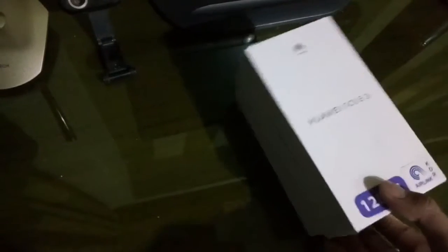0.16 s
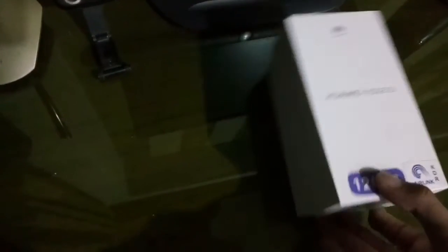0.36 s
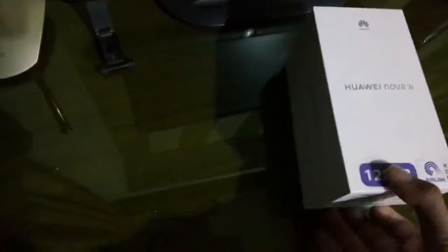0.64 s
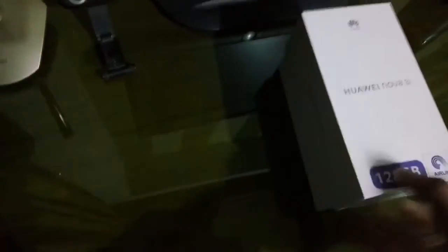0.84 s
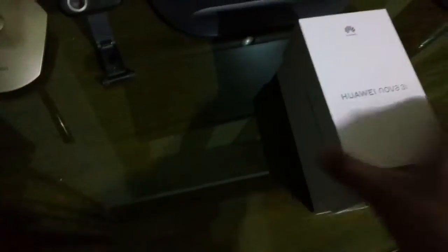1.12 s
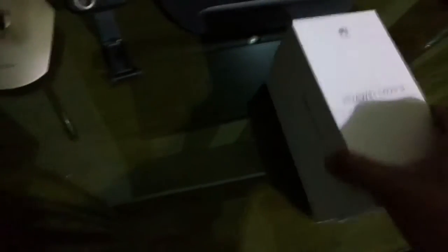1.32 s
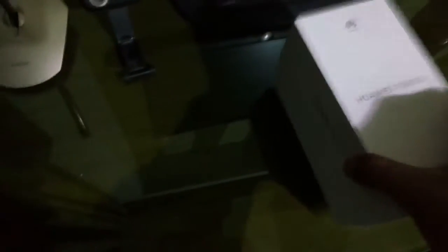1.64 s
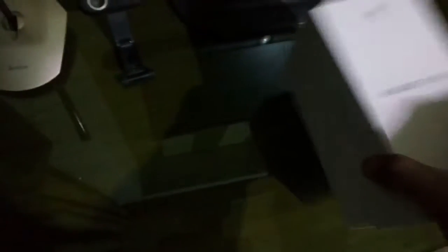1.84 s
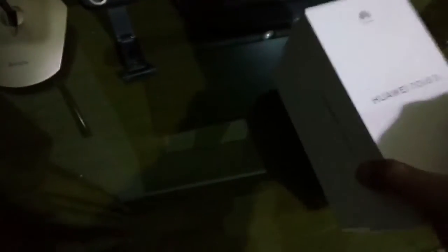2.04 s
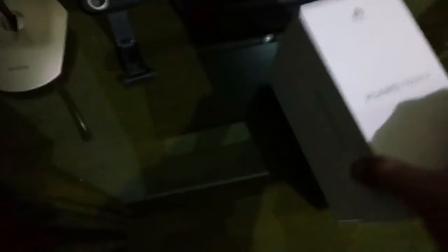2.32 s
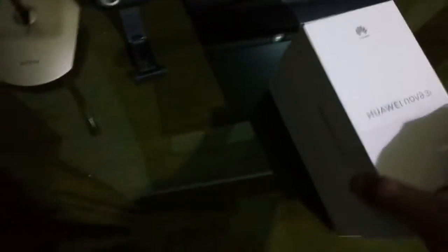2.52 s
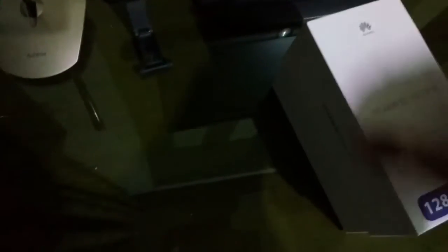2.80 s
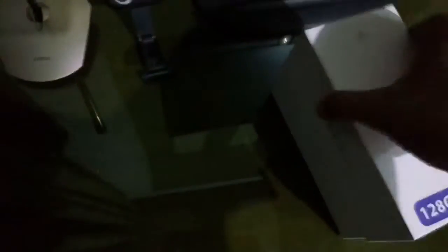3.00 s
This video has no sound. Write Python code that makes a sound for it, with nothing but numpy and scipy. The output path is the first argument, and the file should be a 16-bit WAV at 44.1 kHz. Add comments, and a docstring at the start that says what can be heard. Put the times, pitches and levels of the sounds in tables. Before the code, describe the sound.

A cardboard box is handled, knocking and rattling as its tight lid is worked loose.

```python
"""In a small, quiet room, a cardboard box is turned in the hand on a table, close to a phone.
Fingers rub over the card in tiny slips, and the air in the hollow box pops once.
The box knocks and rattles as its tight lid is worked loose; each knock rings the card and the table.
The box, its echo and a low rumble are on the left only; both channels carry a faint hiss."""
import sys
import numpy as np
from scipy import signal
from scipy.fft import rfft, irfft, next_fast_len
from scipy.io import wavfile

SR = 44100
rng = np.random.default_rng(int(sys.argv[2]) if len(sys.argv) > 2 else 0)


def materialize(psi):
    """Save the field psi as 16-bit PCM at rate SR to the path in sys.argv[1].

    A 1-D psi becomes a single channel; in a 2-D psi each row is a channel.
    """
    bounded = np.clip(np.atleast_2d(psi).T, -1, 1)
    quanta = np.round(bounded * 32767).astype(np.int16)
    wavfile.write(sys.argv[1], SR, quanta)


N = 138915

# tone of the microphone hiss: pitch_hz, gain_db
HISS_TONE = [(25, 5.5), (70, 4), (150, 7), (400, 0), (1000, -3.5), (3000, -11.5), (6000, -13.5),
             (7600, -24.5), (16000, -30)]
# tone of the room's rumble: pitch_hz, gain_db
RUMBLE_TONE = [(25, -26.5), (48, -17.5), (68, -4), (88, -3), (130, -8.5), (200, -14.5), (400, -30.5),
               (1500, -54.5)]
# how rumble and hum rise and fall together: time_s, gain_db
RUMBLE_SWELL = [(0, -55.5), (.24, -53), (.36, -64.5), (.52, -68), (.6, -52), (1.05, -56.5), (1.15, -66.5),
                (1.3, -51.5), (2.3, -48.5), (2.8, -54.5), (3.05, -53.5)]
# finger strokes: peak_s, rise_s, fall_s, body_db, rasp_db, hiss_db, squeak_hz, squeak_db
STROKES = [(.02, 0.14, 0.048, -58, -58.5, -84, 3220, -70),
           (.098, 0.011, 0.0098, -77, -56, -67, 3150, -51.5),
           (0.101, 0.0052, 0.01, -72, -62, -71, 5600, -53),
           (0.137, 0.0061, 0.0055, -62, -48, -53.5, 3130, -44),
           (.17, 0.03, 0.023, -51, -59, -60, 5400, -76), (.402, 0.013, 0.012, -57, -43.5, -41, 5100, -45.5),
           (.48, 0.19, 0.21, -67, -60.5, -65, 2990, -65.5),
           (.595, .045, 0.022, -50.5, -61, -51.5, 3430, -62), (.655, 0.034, 0.02, -52, -49, -54, 3380, -50),
           (.747, 0.049, 0.0062, -50, -53, -64, 3380, -59.5),
           (.783, 0.014, 0.013, -41, -37.5, -48, 3380, -39.5),
           (0.7931, 0.0018, 0.0021, -28, -54, -50, 5220, -22.5),
           (0.984, 0.015, 0.013, -57, -51, -54, 3330, -47.5),
           (1.37, 0.038, 0.046, -52, -54.5, -57, 4660, -66), (1.63, 0.021, 0.18, -54, -56, -69, 3560, -85),
           (1.487, .006, 0.0092, -42, -62, -38, 3580, -68),
           (1.72, 0.0063, 0.012, -36.5, -36.5, -48.5, 1800, -37),
           (1.77, 0.038, 0.03, -49.5, -44, -51, 5840, -69),
           (1.875, 0.031, 0.086, -46.5, -47, -58, 5370, -70),
           (1.978, .006, 0.093, -46.5, -48.5, -69, 1520, -67),
           (2.055, 0.028, 0.014, -41, -51.5, -48, 5980, -54.5),
           (2.125, .008, 0.038, -34, -34, -46, 4480, -47.5),
           (2.35, 0.024, 0.034, -25, -29.5, -40.5, 4000, -43.5),
           (2.78, 0.08, .03, -78.5, -76, -60, 5590, -64.5),
           (3.14, 0.031, .04, -58.5, -60.5, -65, 3250, -78)]
# tone of rubbed card: pitch_hz, gain_db
RUB_TONE = [(120, -3), (330, 10.5), (480, 2), (780, -8.5), (1150, 5), (1700, -2), (2350, -6), (3000, -4.5),
            (3500, -6.5), (4300, -10), (5500, -10.5), (7600, -25.5), (15000, -35)]
# knocks on the box: start_s, thump_hz, clack_hz, thump_db, clack_db, crack_db, fizz_db
BOX_KNOCKS = [ (0.1, 352, 1480, -68, -69, -64, -69), (0.1348, 386, 1820, -51, -43.5, -51, -69),
              (0.402, 406, 2010, -61, -46, -60, -60.5), (0.681, 358, 1200, -54, -51, -75, -78),
              (0.7831, 323, 1020, -34.5, -33.5, -37.5, -58), (0.7919, 313, 930, -33.5, -31, -42.5, -44.5),
              (0.819, 336, 1370, -30.5, -45, -55, -74), (.832, 330, 1590, -41, -45.5, -47.5, -73),
              (0.987, 374, 910, -41, -58, -76, -78), (1.280, 292, 1060, -44, -52, -57, -76),
              (1.308, 331, 1050, -56.5, -50, -60, -92), (1.451, 360, 705, -39.5, -54, -61, -83),
              (1.470, 470, 750, -21, -23.5, -44, -58.5), (1.4916, 400, 930, -26.5, -21, -35.5, -52),
              (1.675, 380, 763, -40, -58, -66, -92), (1.721, 356, 1360, -30.5, -39.5, -53, -67),
              (1.7351, 400, 1390, -45.5, -37.5, -40, -58), (1.742, 430, 1160, -26, -25, -32, -55),
              (1.755, 385, 1300, -49.5, -33, -40, -59), (1.760, 394, 1250, -36, -40.5, -47, -71),
              (1.7766, 378, 970, -35.5, -37, -54, -70), (1.8098, 382, 745, -25.5, -27.5, -49, -61),
              (1.998, 385, 750, -27.5, -45, -61, -74), (2.019, 406, 800, -26, -42.5, -44.5, -65),
              (2.035, 403, 1400, -40.5, -37, -42, -69.5), (2.04, 378, 1100, -31, -37.5, -42, -58),
              (2.059, 394, 1430, -41, -31, -40.5, -59), (2.0763, 400, 870, -10.5, -18, -32.5, -48),
              (2.085, 379, 850, -39.5, -20, -32, -57.5), (2.1042, 335, 1200, -21.5, -25, -24.5, -45.5),
              (2.115, 400, 1150, -24.5, -23.5, -28.5, -53.5), (2.1265, 421, 750, -19.5, -18, -32.5, -51),
              (2.272, 400, 900, -40.5, -64.5, -74.5, -91.5), (2.313, 338.7, 703, -27, -43.5, -57.5, -71),
              (2.3228, 600, 1000, -12, -11, -27.5, -44), (2.337, 332, 724, -23, -38.5, -29, -53),
              (2.3451, 420, 750, -9.5, -20, -31, -47.5), (2.3517, 480, 1000, -21, -45, -25.5, -49.5),
              (2.357, 377, 803, -22.5, -33.5, -50.5, -63.5), (2.3947, 507, 1262, -24.5, -18.5, -33, -49.5),
              (2.409, 470, 800, -20, -38, -47, -60), (2.524, 377, 1170, -27, -29.5, -39.5, -63),
              (2.6582, 329, 748, -23.5, -23.5, -40, -59), (2.6642, 395.5, 995, -34, -27, -39.5, -56.5)]
# pitch ranges of thump, clack, crack and fizz, also used for the rubs: low_hz, high_hz
PITCH_RANGES = [(290, 650), (650, 2000), (2000, 7000), (7000, 17000)]
# notes the card panels ring at (a fade is the time to drop 60 dB): pitch_hz, gain_db, fade_s
CARD_NOTES = [(275, -2.5, 0.036), (332, 6, 0.038), (414, 5.5, 0.042), (470, 0, 0.049), (544, -1.5, 0.096),
              (643, 3.5, 0.037), (763.5, 0, 0.022), (946, -0.5, 0.017), (1102, 0, .028), (1141, -16, 0.008),
              (1540, -8.5, 0.043), (1820, -0.5, 0.021), (2000, 1.5, .016)]
# tone of the crack at the card's edge: pitch_hz, gain_db
CRACK_TONE = [(500, 5), (2000, 3), (2700, -0.5), (3400, -1.5), (4500, -11), (5500, -8.5), (6500, -17.5),
              (7600, -23), (11000, -21), (16000, -23.5)]
# notes of the table under the box: pitch_hz, gain_db, fade_s
TABLE_NOTES = [(62, -2, 0.66), (111.2, 4, 0.99), (121.1, -4, .35), (167.6, 4, 0.63)]
# notes of the air inside the box: pitch_hz, gain_db, fade_s
AIR_NOTES = [(337, 3, 0.058), (309.6, -12, 0.23), (176, -17, 0.12)]
# the room's echo, in octave-wide bands: pitch_hz, fade_s, gain_db
ROOM_ECHO = [(116.4, 0.49, -1), (237.6, .42, -11.5), (389.3, .3, -10.5), (745, 0.27, -8.5),
             (1650, 0.3, -8.5), (3200, .28, -11), (6400, 0.18, -10), (12000, 0.14, -10)]
# notes that ring between the walls: pitch_hz, gain_db, fade_s
ROOM_NOTES = [(170.3, -9, .4), (240, -9.5, .33), (276, -6, .27), (318.8, 4, 0.33), (419.7, 0.5, 0.39),
              (451, -1.5, 0.37), (547, -4, 0.44), (915, -6, 0.398)]


def gain(db):
    """Turn decibels into a number to multiply by."""
    return 10 ** (np.asarray(db) / 20)


def set_level(x, db):
    """Set a sound's average (rms) level."""
    return x * gain(db) / np.sqrt(np.mean(x ** 2))


def set_hit_level(x, db):
    """Scale a hit so that its energy, spread over 10 ms, has the given level."""
    return x * gain(db) / np.sqrt(np.sum(x ** 2) / (.01 * SR))


def band(x, low_hz, high_hz, order=3):
    """Keep the sound between two pitches."""
    edges = [low_hz, min(high_hz, SR * .49)]
    return signal.sosfilt(signal.butter(order, edges, "band", fs=SR, output="sos"), x)


def shape_tone(x, points):
    """Turn lows and highs up or down along a curve of (pitch_hz, gain_db) points."""
    size = 2 * next_fast_len(len(x))
    hz, db = np.array(points).T
    curve_db = np.interp(np.log(np.fft.rfftfreq(size, 1 / SR) + 1), np.log(hz), db)
    cepstrum = irfft(np.log(gain(curve_db)))
    cepstrum[1:size // 2] *= 2  # fold it so the filter never rings ahead of the sound
    cepstrum[size // 2 + 1:] = 0
    return irfft(rfft(x, size) * np.exp(rfft(cepstrum)))[:len(x)]


def fade(t, fade_s):
    """Die away by 60 dB every fade_s seconds."""
    return np.exp(-np.log(1000) * t / fade_s)


def ring(t, notes):
    """A struck thing rings with several fading notes at once."""
    return sum(gain(db) * fade(t, fade_s) * np.sin(2 * np.pi * hz * t) for hz, db, fade_s in notes)


def add(out, start_s, x):
    """Mix a sound in at a given time."""
    i = int(start_s * SR)
    out[i:i + len(x)] += x[:N - i]


def hiss():
    """The microphone adds a faint, steady noise."""
    return set_level(shape_tone(rng.standard_normal(N), HISS_TONE), db=-62)


def rumble(hum_hz=71):
    """Low room noise and a hum waver in loudness together."""
    t = np.arange(N) / SR
    hum = set_level(np.sin(2 * np.pi * hum_hz * t), -2.5)
    noise = set_level(shape_tone(rng.standard_normal(N), RUMBLE_TONE), -1)
    swell_db = np.interp(t, *np.array(RUMBLE_SWELL).T)
    return (hum + noise) * gain(swell_db)


def finger_rubs(slips_per_s=3000, scatter_db=2.5, squeak_width=.15):
    """Skin slides on card in many tiny slips that ring a squeak; each stroke swells and dies away."""
    t = np.arange(N) / SR
    slips = (rng.random(N) < slips_per_s / SR) * rng.standard_normal(N)
    slips *= gain(-scatter_db * rng.standard_normal(N))
    card = shape_tone(slips, RUB_TONE)
    body, rasp = band(card, *PITCH_RANGES[0]), band(card, *PITCH_RANGES[1])
    highs = band(card, PITCH_RANGES[2][0], high_hz=16000)
    powers, squeaks = np.zeros((3, N)), 0
    for peak_s, rise_s, fall_s, *levels_db, squeak_hz, squeak_db in STROKES:
        slope_s = np.where(t < peak_s, rise_s, fall_s)
        stroke = np.exp(-np.abs((t - peak_s) / slope_s) ** 1.45)
        powers += (gain(levels_db)[:, None] * stroke) ** 2
        spread_hz = squeak_hz * squeak_width / 2
        squeak = band(slips, squeak_hz - spread_hz, squeak_hz + spread_hz, order=2)
        squeaks += stroke * set_level(squeak, squeak_db)
    rubbing = sum(set_level(part, 0) * np.sqrt(power) for part, power in zip([body, rasp, highs], powers))
    return squeaks + rubbing


def card_ring(t, pitch_hz, focus_octaves=.25, scatter_db=6):
    """Struck card rings mostly in its notes near one pitch, with a short grit of fibres."""
    hz, db, fade_s = np.array(CARD_NOTES).T
    strength, detune = rng.standard_normal((2, len(hz)))
    distance = np.log2(hz / pitch_hz) / focus_octaves
    db = db + scatter_db * strength - 20 * np.log10(1 + distance ** 2)
    notes = ring(t, zip(hz * (1 + .032 * detune), db, fade_s))
    grit = band(rng.standard_normal(len(t)), pitch_hz / 2, pitch_hz * 2) * fade(t, fade_s=.028)
    return set_hit_level(notes, 0) + set_hit_level(grit, -9.5)


def box_knocks(crack_rise_s=.0013, table_gain_db=-27.5):
    """Each knock thumps and clacks the card, cracks at the edge and shakes the table."""
    out, t = np.zeros(N), np.arange(SR // 8) / SR
    table = ring(np.arange(SR) / SR, TABLE_NOTES)
    for start_s, thump_hz, clack_hz, *levels_db in BOX_KNOCKS:
        burst = rng.standard_normal(len(t)) * fade(t, fade_s=.014) * (1 - np.exp(-t / crack_rise_s))
        crack = shape_tone(burst, CRACK_TONE)
        parts = [card_ring(t, thump_hz), card_ring(t, clack_hz), crack, crack]  # fizz is the crack's top
        for part, edges, db in zip(parts, PITCH_RANGES, levels_db):
            add(out, start_s, set_hit_level(band(part, *edges, order=4), db))
        add(out, start_s, table * gain(levels_db[0] + table_gain_db))  # follows the thump
    return out


def hollow_pop(start_s=.7905, rise_s=.0054, gain_db=-7):
    """A finger slips off the edge and the air in the hollow box rings."""
    out, t = np.zeros(N), np.arange(SR // 2) / SR
    add(out, start_s, gain(gain_db) * ring(t, AIR_NOTES) * (1 - np.exp(-t / rise_s)))
    return out


def room_echo(x, rise_s=.01, notes_gain_db=-68):
    """The small room adds its own notes and a smooth echo that lasts longest in the bass."""
    t = np.arange(SR * 3 // 4) / SR
    build_up = 1 - np.exp(-(t / rise_s) ** 2)
    echo = gain(notes_gain_db) * ring(t, ROOM_NOTES)
    for hz, fade_s, db in ROOM_ECHO:
        low_hz, high_hz = hz / np.sqrt(2), hz * np.sqrt(2)
        tail = band(rng.standard_normal(len(t)), low_hz, high_hz) * fade(t, fade_s) * build_up
        share = 2 * (high_hz - low_hz) / SR  # this band's part of a click's energy
        echo += tail * gain(db) * np.sqrt(share / np.sum(tail ** 2))
    return x + signal.fftconvolve(x, echo)[:N]


def scene():
    """Box and room on the left, microphone hiss on both sides."""
    left_hiss, right_hiss = hiss(), hiss()
    box = box_knocks() + hollow_pop() + finger_rubs()
    return np.array([left_hiss + room_echo(box) + rumble(), right_hiss])


def record(dry):
    """The phone flattens peaks beyond full scale and cuts the highs above 16 kHz."""
    high_cut = signal.ellip(8, .2, 70, 16000, fs=SR, output="sos")
    return signal.sosfilt(high_cut, np.clip(dry, -1, 1))


dry = scene()
out = record(dry)
materialize(out)
```